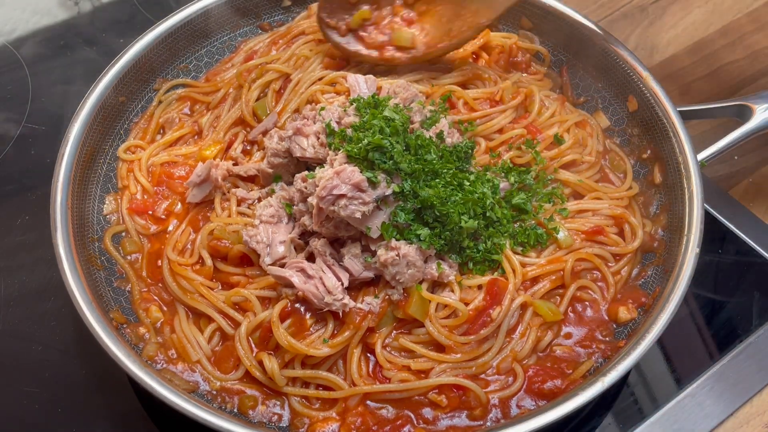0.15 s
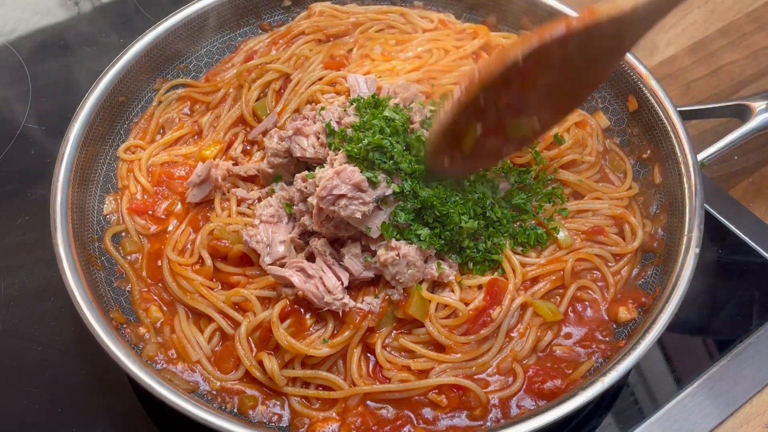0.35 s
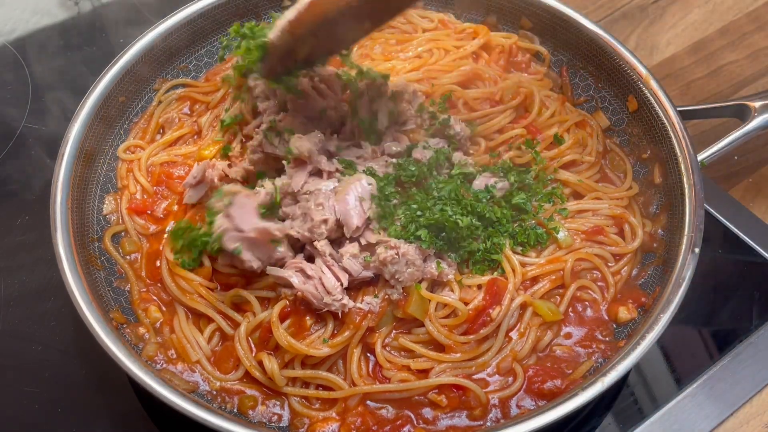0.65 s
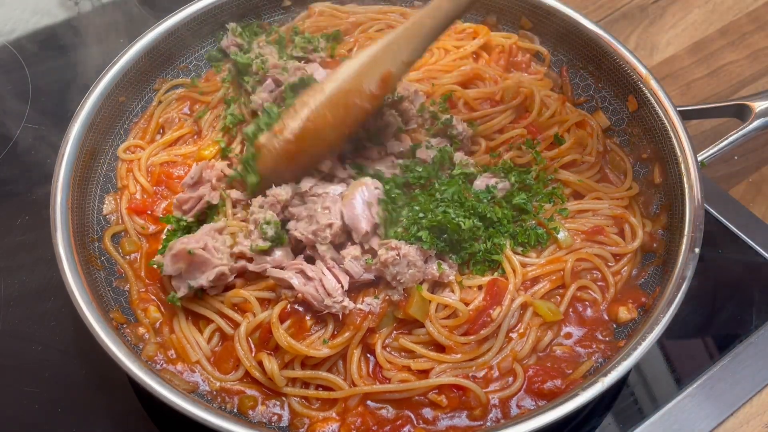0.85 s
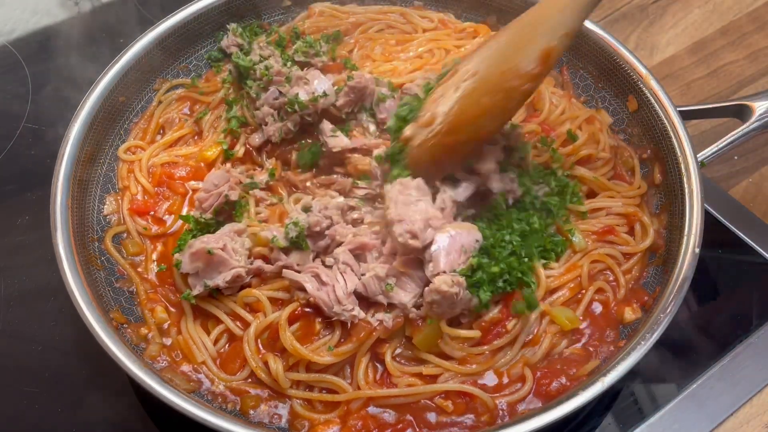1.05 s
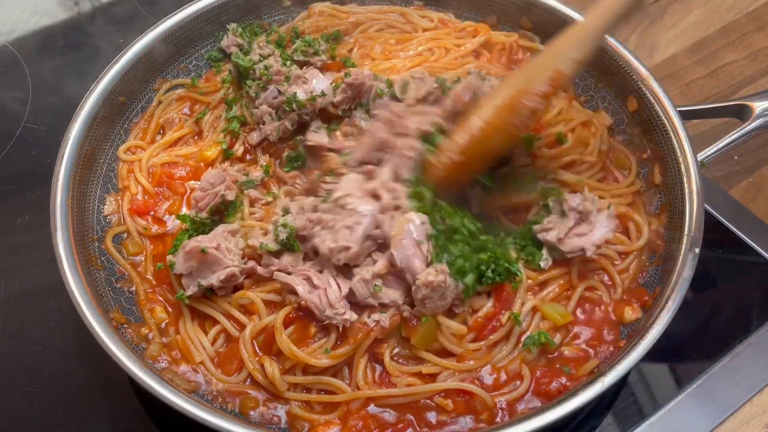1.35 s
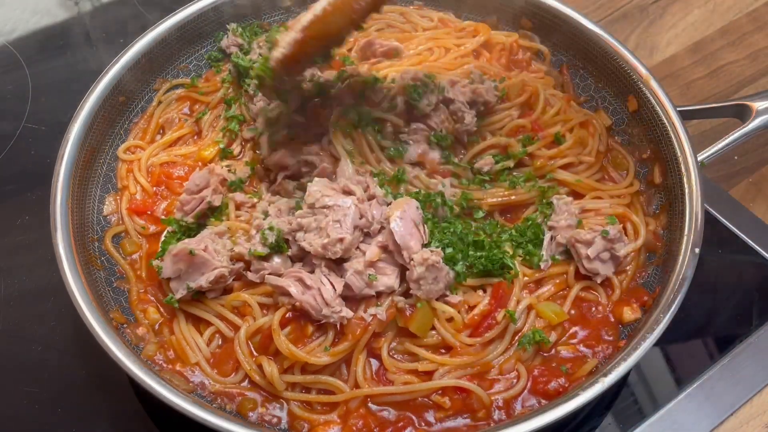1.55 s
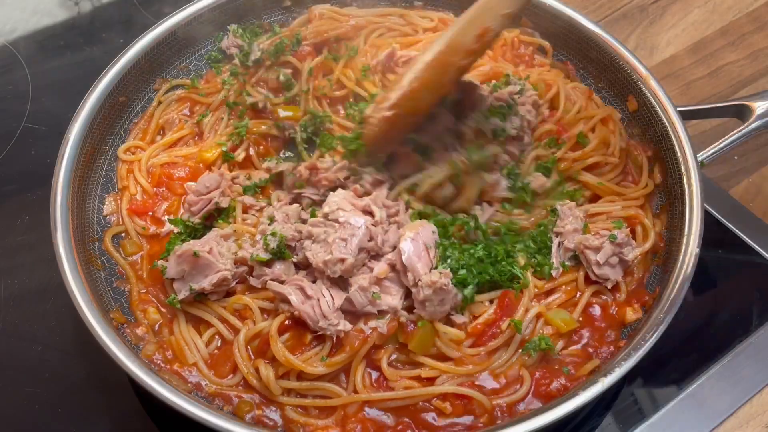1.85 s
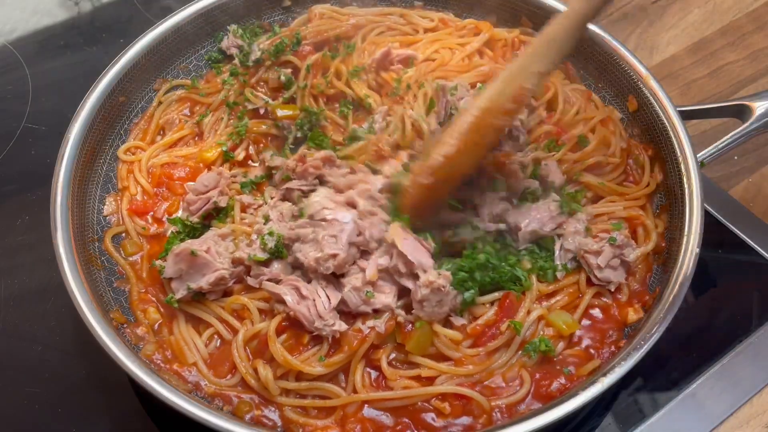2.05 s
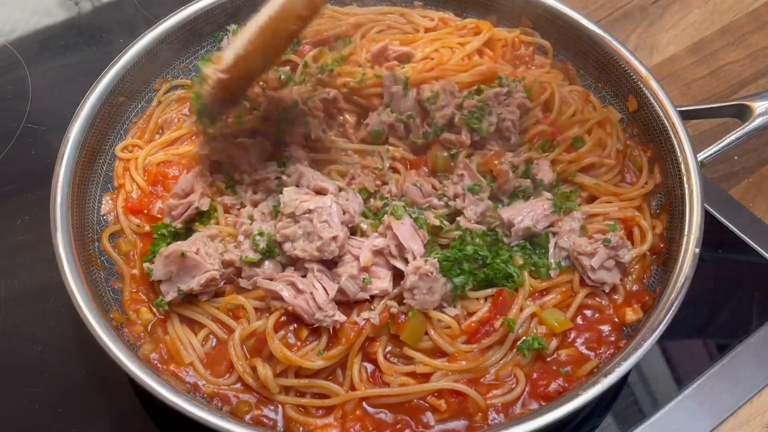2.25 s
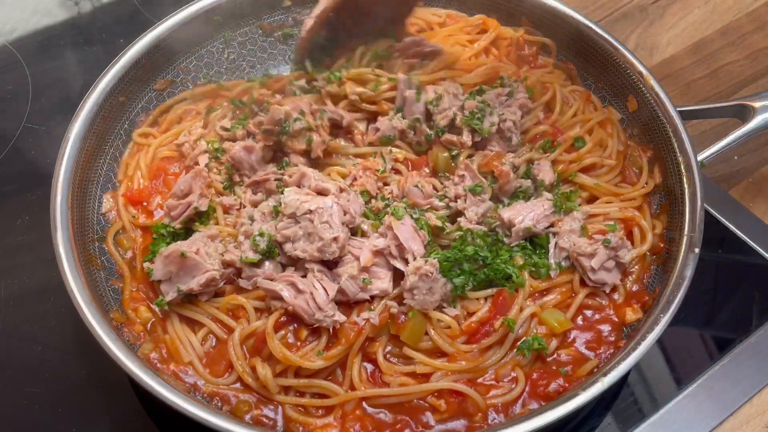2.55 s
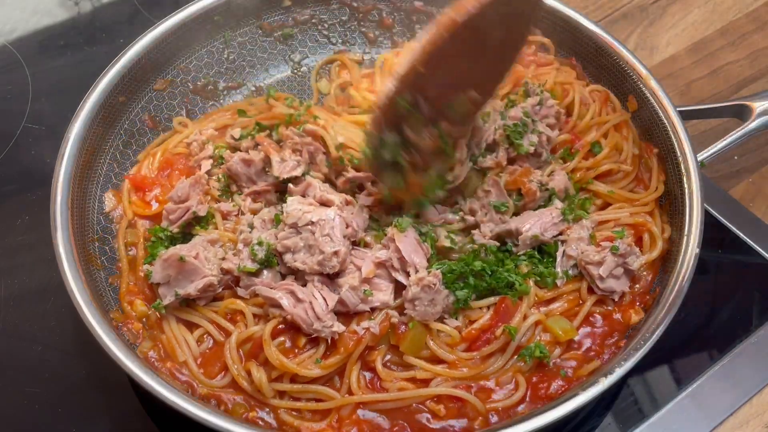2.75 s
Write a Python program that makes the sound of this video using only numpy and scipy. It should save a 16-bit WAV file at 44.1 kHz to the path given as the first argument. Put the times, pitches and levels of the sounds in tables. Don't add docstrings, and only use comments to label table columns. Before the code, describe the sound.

Pasta in sauce is stirred with a wooden spoon in a steel pan, heard close in stereo. Quiet wet squelches, hiss, crackles and small pops swell with each stroke, strongest near 1.0 and 1.8 seconds. A low thump comes at 1.65. At 2.4 the spoon knocks the rim: a loud woody clack, short metallic ring and rattle, with deep thud. Soft stirring continues over faint fan hum.

```python
import sys
import numpy as np
from scipy import signal
from scipy.fft import rfft, irfft, next_fast_len
from scipy.io import wavfile
from scipy.ndimage import uniform_filter1d, map_coordinates

SR = 44100
rng = np.random.default_rng(int(sys.argv[2]) if len(sys.argv) > 2 else 0)


def volts_from_decibels(level):
    exponent = np.asarray(level, float) / 20
    return 10 ** exponent


def bounce(signal):
    frames = np.transpose(np.atleast_2d(signal))
    limited = np.clip(frames, -1, 1)
    pcm = np.round(limited * 32767).astype(np.int16)
    wavfile.write(sys.argv[1], SR, pcm)


N = 127890
T = np.arange(N) / SR


def unit(x):
    return x / np.sqrt(np.mean(x ** 2) + 1e-20)


def along(points, hz):
    f, v = np.transpose(points)
    return np.interp(np.log(hz + 1), np.log(f + 1), v)


def wobble(rate):
    return map_coordinates(rng.standard_normal(400), [T * rate])


def bump(s, half_s):
    return np.exp(-np.abs((T - s) / half_s) ** 2.24)


def filtered(x, response):
    m = next_fast_len(N + SR // 2)
    return irfft(rfft(x, m) * response(np.fft.rfftfreq(m, 1 / SR)), m)[..., :N]


def rush(spectrum, patchy_db):
    z = signal.stft(rng.standard_normal(N + 512), nperseg=256)[2]
    field = uniform_filter1d(rng.standard_normal(z.shape), size=10, axis=0)
    field = uniform_filter1d(field, size=6, axis=1)
    x = signal.istft(z * volts_from_decibels(patchy_db * unit(field)), nperseg=256)[1][:N]
    return unit(filtered(x, lambda hz: volts_from_decibels(along(spectrum, hz))))


def grains(s, db, hz, cycles, snap, size):
    t = np.arange(size) / SR
    u = t * (hz / cycles)[:, None] * 4
    swell = volts_from_decibels(db)[:, None] * u * np.exp(1 - u)
    tone = np.sin(2 * np.pi * hz[:, None] * t)
    g = swell * (tone + snap * rng.standard_normal(u.shape))
    place = np.round(s * SR).astype(int)[:, None] + np.arange(size)
    return np.bincount(place.ravel(), g.ravel(), N + SR)[:N]


# middle in seconds, effort in dB over rest, half
# length in seconds.
STROKES = [(0.116, 3, 0.31), (0.508, 4, 0.1), (0.769, 5, 0.085), (0.972, 13, 0.094), (1.04, 3.5, 0.057),
           (1.134, 8.5, 0.069), (1.218, 6, 0.045), (1.387, 9, 0.1), (1.666, 5, 0.056), (1.796, 12, 0.084),
           (1.956, 8, 0.086), (2.107, 8, 0.084), (2.256, 3.5, 0.12), (2.363, -8, 0.035), (2.623, 8, 0.093),
           (2.798, 9, 0.18)]


def stirring():
    return sum(db * bump(s, half_s) for s, db, half_s in STROKES)


# frequency in Hz, level in dB.
HISS_COLOUR = [(500, -19), (1500, -8.5), (3500, -0.5), (6000, 0.5), (8500, -2), (11000, -10), (16000, -61)]
FIZZ_COLOUR = [(5000, -27), (8500, 1.5), (11000, -8.5), (14000, -5.5), (16000, -7)]
SQUELCH_COLOUR = [(100, 4), (250, 0), (450, -0.5), (900, -2.5), (2000, -4), (5000, -15), (9000, -76)]
# time in seconds, dB over the hiss.
SQUISHES = [(.117, 5), (.275, 5.5), (0.755, 10), (.832, 7), (0.976, 6.5), (1.03, 7), (1.099, 8.5),
            (1.235, 6.5), (1.283, 4), (1.495, 2), (1.58, 10), (1.645, 7.5), (1.9, -1), (1.939, 6),
            (1.994, 8.5), (2.014, 6), (2.068, 9.5), (2.301, 8.5), (2.503, 8)]


def simmer(effort_db):
    squish_s, squelch_lead_s = 0.0026, 0.036
    flutter_db = 1.7 * wobble(70) + sum(db * bump(s, squish_s) for s, db in SQUISHES)
    hiss_db = -68 + 0.74 * effort_db + flutter_db
    fizz_db = -73 + 0.79 * effort_db + 3 * T + flutter_db
    early_effort_db = np.interp(T + squelch_lead_s, T, effort_db)
    squelch_db = -64.5 + 0.86 * early_effort_db + wobble(50) + flutter_db
    hiss = volts_from_decibels(hiss_db) * rush(HISS_COLOUR, patchy_db=4.0)
    fizz = volts_from_decibels(fizz_db) * rush(FIZZ_COLOUR, patchy_db=4.0)
    squelch = volts_from_decibels(squelch_db) * rush(SQUELCH_COLOUR, patchy_db=1.5)
    return hiss + fizz + squelch


def crackle(effort_db):
    when, luck, size = rng.random((3, 900))
    s = when * T[-1]
    effort_then_db = effort_db[(s * SR).astype(int)]
    db = -61.5 + 0.88 * effort_then_db - 3.5 * np.log(luck + 0.039) - 9 * size
    hz = 14000 * volts_from_decibels(-18 * size ** 1.3)
    return grains(s, db, hz, cycles=4.5, snap=0.053, size=200)


# time in seconds, peak level in dB, pitch in Hz.
POPS = [(.0633, -51, 3070), (0.1157, -41, 3600), (0.739, -54, 4110), (0.7543, -49, 6500), (.768, -49, 3300),
        (0.831, -42, 6300), (1.0271, -47, 6400), (1.028, -48, 2600), (1.0945, -46, 2100),
        (1.2045, -54, 5500), (1.237, -50, 2800), (1.268, -53, 4380), (1.281, -41.5, 5430),
        (1.288, -49, 5500), (1.3785, -50, 3690), (1.4095, -50, 3750), (1.4921, -44, 5920),
        (1.644, -49, 2900), (1.9, -50, 2030), (1.938, -44, 2330), (1.9754, -51, 4500), (1.9921, -50, 2670),
        (2.012, -49, 1900), (2.0373, -44, 6500), (2.0635, -47, 3970), (2.066, -47, 2300),
        (2.3963, -42, 2200)]
LATE_POPS = [
    (2.5014, -42, 4000),
    (2.5244, -50, 3650),
    (2.7951, -51, 3540),
]
SPITS = [(0.0407, -43.5, 12100), (0.2732, -47.5, 10260), (0.543, -43, 13800), (0.5921, -47.5, 14000),
         (0.7532, -49, 11800), (0.8683, -45, 15100), (1.201, -43, 13000), (1.6695, -47, 13700),
         (1.7027, -36, 10000), (1.7594, -51, 15300), (2.1206, -47, 13700), (2.4809, -38, 13500),
         (2.5595, -49, 14000)]


def pops():
    s, db, hz = np.transpose(list(POPS) + list(LATE_POPS) + list(SPITS))
    cycles = np.where(hz > 9500, 11, 7)
    return grains(s, db, hz, cycles, snap=0.4, size=400)


# time in seconds, peak level in dB, pitch in Hz.
SLAPS = [(.263, -54, 890), (0.392, -52.5, 378), (0.625, -50, 393), (0.973, -47.5, 770), (1.024, -45, 467),
         (1.094, -45, 500), (1.271, -54, 473), (1.514, -57, 387), (1.575, -52, 480), (1.577, -50, 780),
         (1.635, -51, 297), (1.937, -44, 487), (1.939, -47, 810), (1.99, -46.5, 312), (2.063, -59, 486),
         (2.298, -50.5, 730), (2.325, -55, 487)]


def slaps():
    s, db, hz = np.transpose(SLAPS)
    return grains(s, db - 3.0, hz, cycles=5.1, snap=0.12, size=1500)


def sauce():
    effort_db = stirring()
    return simmer(effort_db) + crackle(effort_db) + pops() + slaps()


# middle in seconds, level in dB,
# pitch in Hz, half length in seconds.
HUMS = [(0.137, -56, 59.2, 0.12), (0.577, -59.5, 63.3, 0.03), (0.7, -57, 69.3, 0.051),
        (0.787, -62, 82, 0.053), (0.998, -50, 62.4, 0.02), (1.05, -48.5, 60, 0.031),
        (1.159, -54.5, 61.4, 0.038), (1.285, -54.5, 59.6, 0.041), (1.45, -57, 71.6, 0.049),
        (1.628, -36.5, 88.7, 0.022), (1.666, -31, 83.5, 0.029), (1.741, -39.5, 70, 0.051),
        (1.802, -45, 99.7, 0.066), (1.857, -39, 57, 0.029), (1.924, -45, 72.6, 0.027),
        (2.089, -49, 57.5, 0.1), (2.303, -55.5, 69, 0.09), (2.437, -25.5, 71, 0.032),
        (2.435, -37, 50, .025), (2.481, -33.5, 75, 0.019), (2.585, -50, 62, .02), (2.524, -35, 81, 0.015),
        (2.671, -50.5, 72.5, 0.028), (2.775, -57, 74.3, 0.072)]
# frequency in Hz, level in dB.
HUM_BODY = [(60, 3), (110, 1.5), (200, -15.5), (350, -9.5), (800, -49)]
RUMBLE_COLOUR = [(25, -14), (45, -3), (62, -6), (85, -5), (120, -34), (200, -38)]


def hob():
    lead = 0.11
    drift = 0.03 * np.cumsum(wobble(25)) / SR
    tone, load = 0, 0
    for s, db, hz, half_s in HUMS:
        tone = tone + volts_from_decibels(db) * bump(s, half_s) * np.cos(2 * np.pi * hz * (T - s + drift))
        load = load + volts_from_decibels(db) * bump(s, half_s * 1.6)
    tone = tone * volts_from_decibels(1.5 * wobble(35))
    body = volts_from_decibels(-18.5) * load * rush(HUM_BODY, patchy_db=4.0)
    rumble = volts_from_decibels(-67.5) * rush(RUMBLE_COLOUR, patchy_db=1)
    return filtered(tone + body + rumble, lambda hz: np.exp(1j * lead * np.array([[1], [-1]])))


# frequency in Hz, level in dB per Hz.
FAN_COLOUR = [(15, 9), (25, 1), (90, -8), (146, 1), (266, -8.5), (456, -2.5), (505, -7.5), (849, -6.5),
              (3000, -65), (3900, -67), (6600, -120)]
# frequency in Hz, likeness (1 is the same, 0 is unrelated).
FAN_ALIKE = [(60, 0.63), (130, 0.16), (400, 0.3), (2000, 0.1)]


def fan():
    def shares(hz):
        turn = np.arccos(np.clip(along(FAN_ALIKE, hz), -1, 1)) / 2
        return [np.cos(turn), np.sin(turn)]

    air = np.array([rush(FAN_COLOUR, patchy_db=0.5), rush(FAN_COLOUR, patchy_db=-2.5)])
    mid, side = filtered(air, shares)
    return volts_from_decibels(-61.5) * np.array([mid + side, mid - side])


# middle in seconds, level in dB, pitch in Hz, half length in seconds.
RUBS = [(0.45, -61.5, 200, .02), (0.499, -59.5, 430, 0.017), (.58, -64.5, 460, 0.027),
        (0.632, -63, 300, 0.014), (0.734, -64, 460, 0.015), (0.804, -61, 440, 0.025),
        (0.891, -52, 460, 0.034), (.935, -55, 315, 0.033), (0.959, -55.5, 810, 0.031),
        (1.0, -58, 150, .025), (1.032, -57, 450, 0.031), (1.353, -62, 450, .04), (1.613, -56, 170, 0.028),
        (1.631, -50, 200, 0.024), (1.648, -53.5, 790, 0.014), (1.7, -60, 850, 0.067),
        (1.698, -45, 140, 0.018), (1.727, -54, 560, 0.024), (1.789, -56, 370, 0.014),
        (1.803, -57.5, 560, 0.022)]


def rubs():
    drift = 0.0598 * np.cumsum(wobble(60)) / SR
    tones = 0
    for s, db, hz, half_s in RUBS:
        tones = tones + volts_from_decibels(db) * bump(s, half_s) * np.cos(2 * np.pi * hz * (T + drift))
    return tones * volts_from_decibels(3 * wobble(80))


def ring(modes, attack_s, t, spread):
    sides = spread * np.array([[.5], [-.5]])
    total = 0
    for k, (hz, db, t60) in enumerate(modes):
        total = total + volts_from_decibels(db - 60 * t / t60) * np.sin(2 * np.pi * hz * t + sides * (-1) ** k)
    return total * (1 - np.exp(-t / attack_s))


# pitch in Hz, level in dB, seconds to fade by 60 dB.
RIM = [(447, -4.5, 0.12), (517.5, -9, 0.16), (637, -10, 0.28), (680, -4.5, 0.11), (771, 0.5, 0.058),
       (995, -9, 0.094), (1140, -20, 0.06)]
WALL = [(1184, -10, .45), (1782, -21, .35), (2120, -17, .22), (2543, -19.5, .15), (3150, -27, .07)]
BASE = [(117.9, -11.5, 0.56), (157.6, -10, 0.48), (211, 4.5, 0.121), (286.4, -15, 0.48), (324.5, -7, 0.33)]
# pitch in Hz, level in dB, seconds to fade by 60 dB.
TWINS = [(1184, -11, .05), (1764, -21, .35)]


def steel(t, base_db, rim_db):
    spread = 0.3
    sides = ring(list(RIM) + list(WALL[:2]), 0.002, t, spread)
    sides = sides - ring(TWINS, 0.0012, t, -spread)
    sides = sides + ring(WALL[2:], 0.00075, t, spread)
    waver_db = 1.5 * wobble(40)[:len(t)]
    return volts_from_decibels(rim_db + waver_db) * sides + volts_from_decibels(base_db) * ring(BASE, 0.0042, t, spread=0.17)


def wood(t, spoon_hz):
    rise_s, tone_t60, crack_t60, crack_hz = 0.0027, 0.006, 0.021, 4970
    crack = filtered(rng.standard_normal(N), lambda hz: 1 / (1 + (hz / crack_hz) ** 2))[:len(t)]
    shape = np.where(t < rise_s, t / rise_s, volts_from_decibels(-60 * (t - rise_s) / tone_t60))
    return shape * np.sin(2 * np.pi * spoon_hz * t) + volts_from_decibels(-20.5 - 60 * t / crack_t60) * crack


# time in seconds, wood level in dB, base level in dB, rim level in dB, spoon pitch in Hz.
KNOCKS = [
    (2.3963, -10, -25, -22.5, 860),
    (2.4034, -16.5, -35.5, -55, 595),
    (2.4193, -26, -61, -38, 990),
]
# frequency in Hz, level in dB.
RATTLE_COLOUR = [(120, 4), (250, 18.5), (700, 0.5), (1200, 9.5), (2500, -12.5), (5000, -38)]


def knock():
    out, t = np.zeros((2, N + SR)), T[:SR // 2]
    for s, db, base_db, rim_db, spoon_hz in KNOCKS:
        start = round(s * SR)
        out[:, start:start + len(t)] += volts_from_decibels(db) * wood(t, spoon_hz) + steel(t, base_db, rim_db)
    age = T - KNOCKS[1][0]
    rattle = np.array([rush(RATTLE_COLOUR, patchy_db=-1.5), rush(RATTLE_COLOUR, patchy_db=-3.0)])
    return out[:, :N] + (age > 0) * volts_from_decibels(-32.5 - 60 * np.abs(age) / 0.47) * rattle


# frequency in Hz, phase in radians.
LEFT_LEADS = [(120, 0), (3200, .9), (5100, .7), (5900, -1.2), (6900, -1.3), (8100, -np.pi), (9400, -np.pi),
              (12300, -2 * np.pi)]


def ports(x, left_db=((100, 0),)):
    def response(hz):
        phase = np.outer([1, -1], along(LEFT_LEADS, hz))
        return np.exp(.5j * phase) * volts_from_decibels(np.outer([1, -1], along(left_db, hz)))

    return filtered(x, response)


# frequency in Hz, seconds to fade by 60 dB.
ROOM_FADE = [(100, 0.19), (500, 0.51), (2000, 0.21), (6000, 0.78), (12000, 0.53)]
# frequency in Hz, level in dB.
ROOM_COLOUR = [(80, -7), (250, 1.5), (7000, -4), (7700, -12), (9600, -14), (10300, 0.5), (11800, -5.5),
               (13000, -14.5)]


def kitchen(x):
    hz, t, z = signal.stft(rng.standard_normal((2, SR // 2)), SR, nperseg=256)
    fade_db = along(ROOM_COLOUR, hz)[:, None] - 60 * t / along(ROOM_FADE, hz)[:, None]
    tail = signal.istft(z * volts_from_decibels(fade_db), SR, nperseg=256)[1]
    late = np.pad(x, (120, 0))[None]
    return signal.fftconvolve(late, tail / np.linalg.norm(tail[0]), axes=1)[:, :N]


# frequency in Hz, level in dB.
KNOCK_LEFT_DB = [(110, -2.5), (200, 1), (380, -2.2), (700, 0.5), (1290, 0.5), (2400, 3), (4400, 3.5),
                 (8000, 0)]


def scene():
    food, blow = sauce() + rubs(), knock()
    near = ports(food) + ports(blow, KNOCK_LEFT_DB) + hob()
    echo = volts_from_decibels(-8.5) * kitchen(food) + volts_from_decibels(-13) * kitchen(blow.mean(0))
    return near + echo + fan()


def roll_off(x):
    return signal.sosfilt(signal.butter(12, 16460, fs=SR, output="sos"), x)


def record(dry):
    top_hz = 15830
    mix = filtered(dry, lambda hz: hz < top_hz)
    return roll_off(mix)


dry = scene()
out = record(dry)
bounce(out)
```